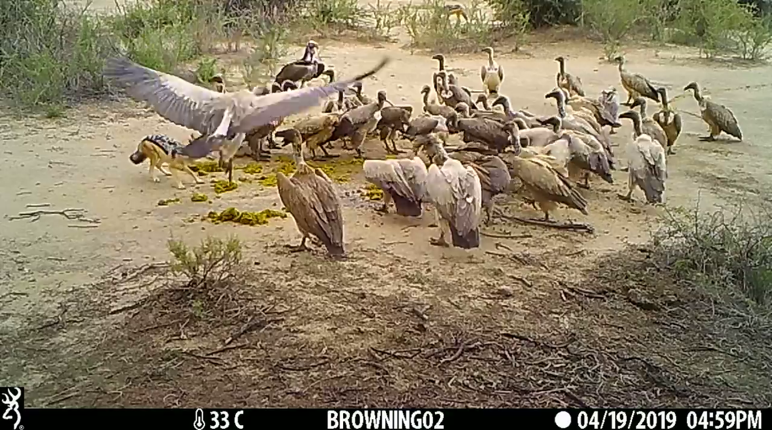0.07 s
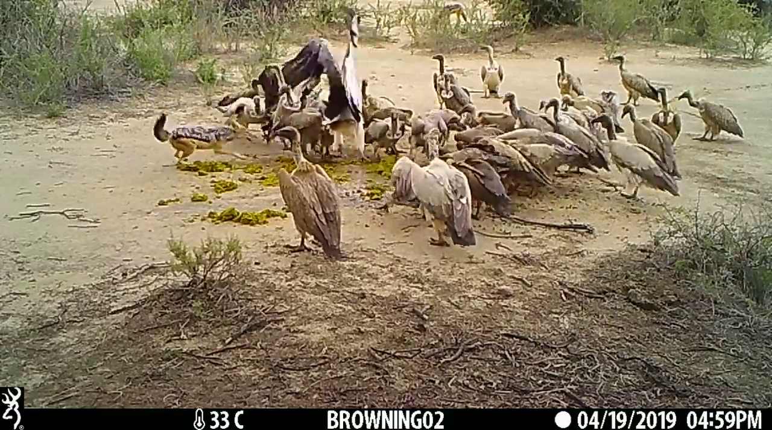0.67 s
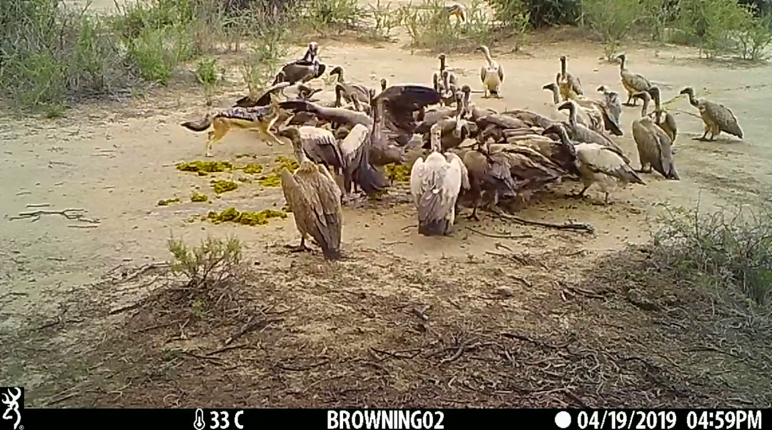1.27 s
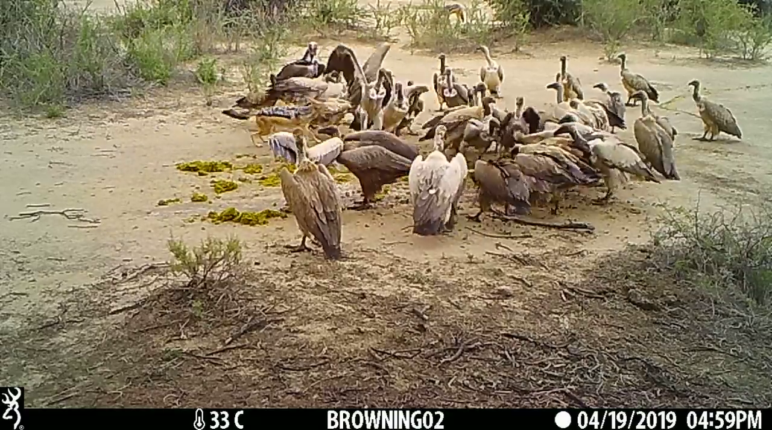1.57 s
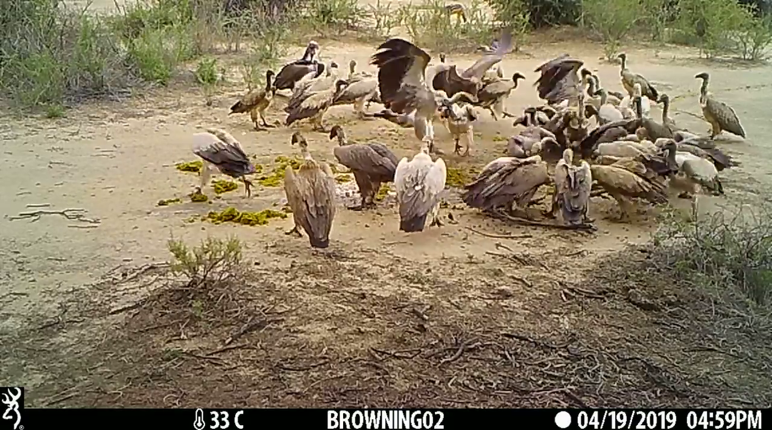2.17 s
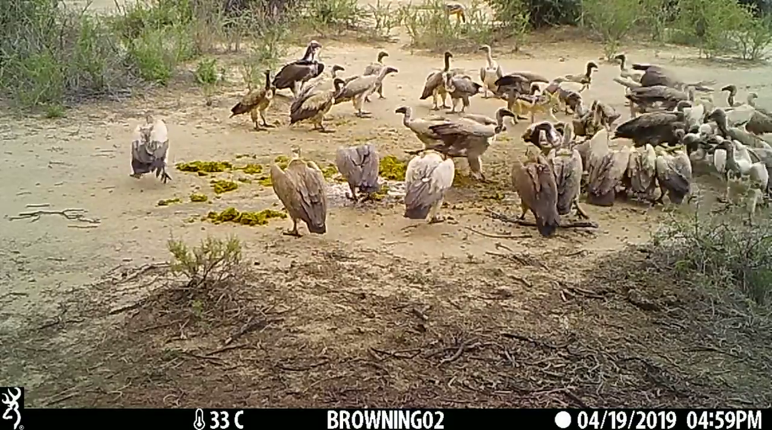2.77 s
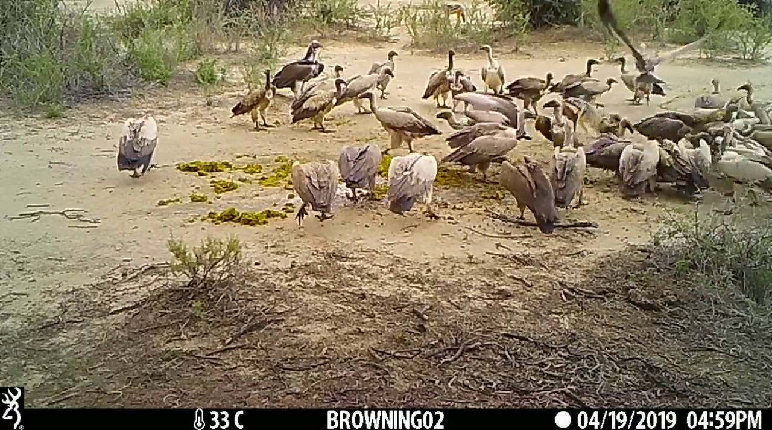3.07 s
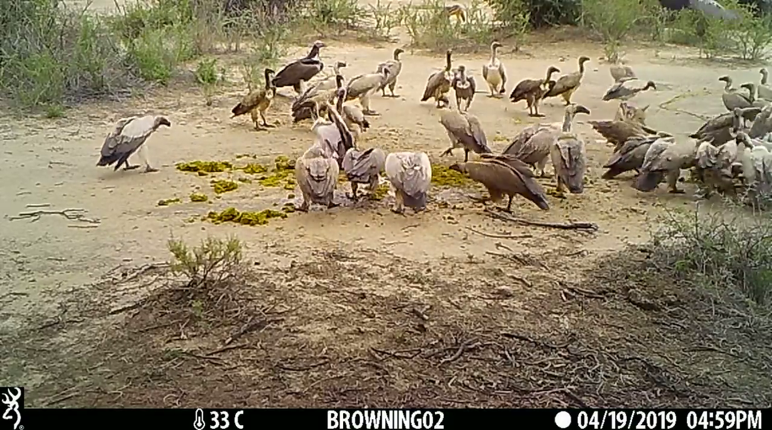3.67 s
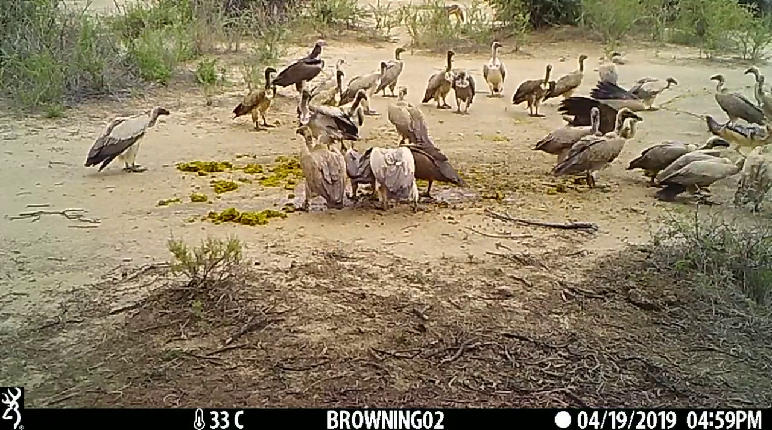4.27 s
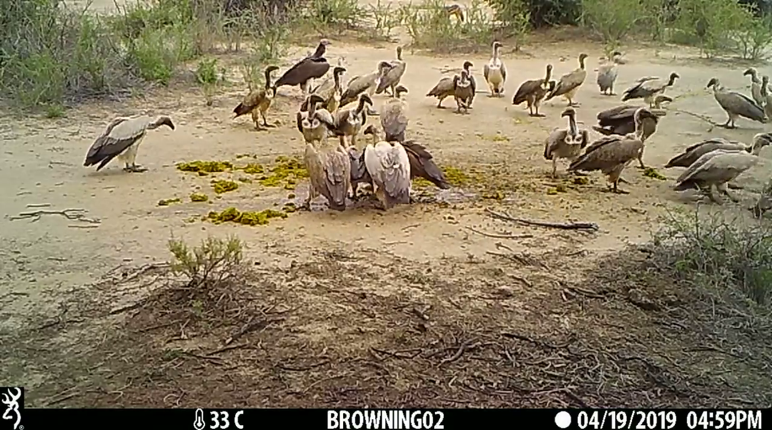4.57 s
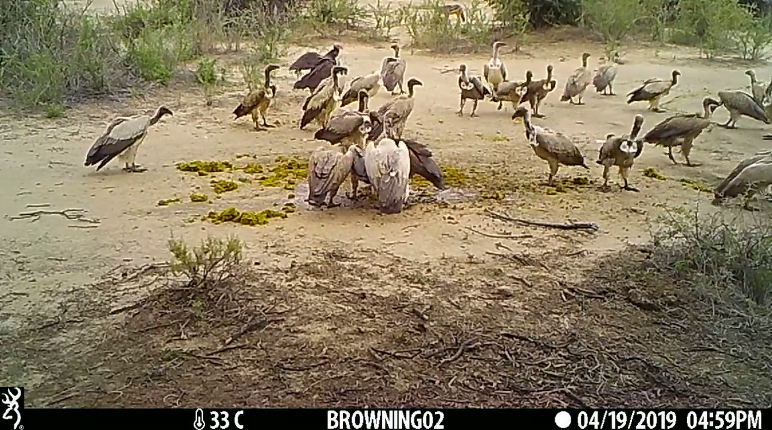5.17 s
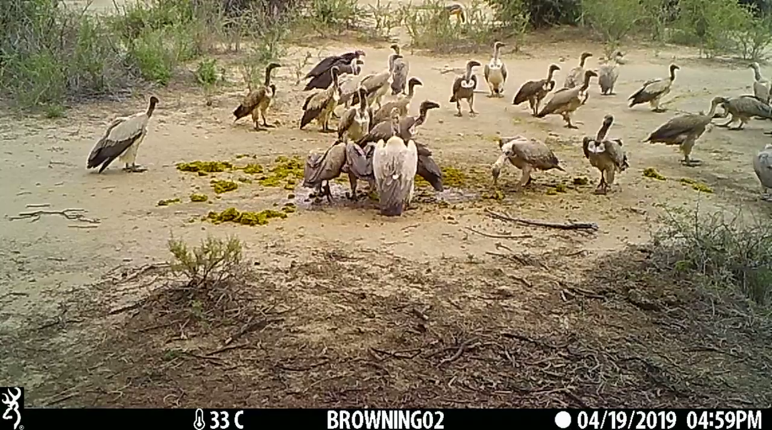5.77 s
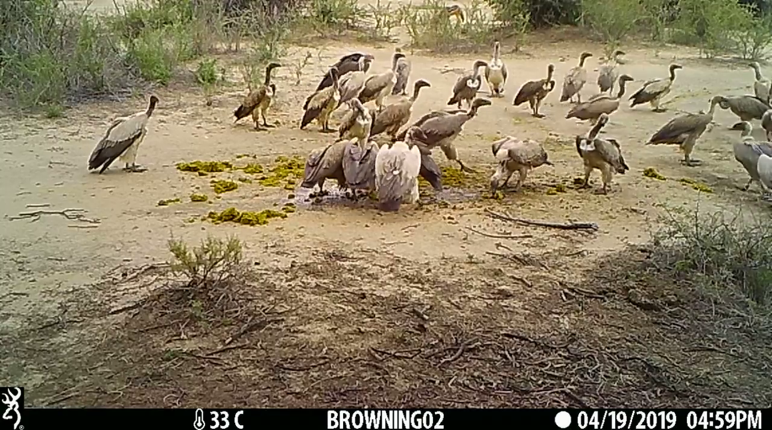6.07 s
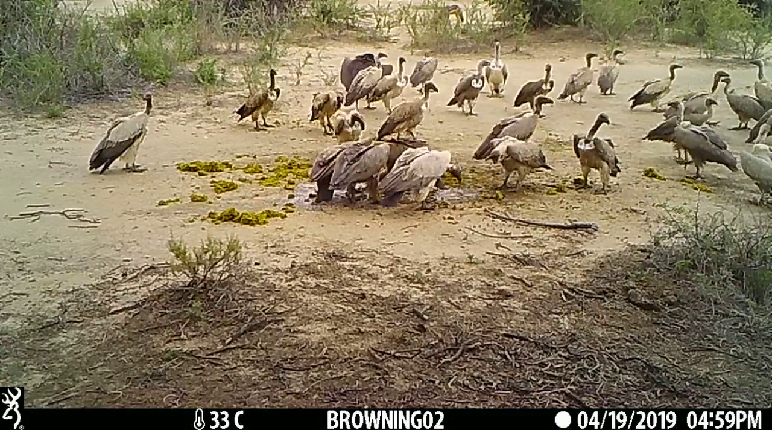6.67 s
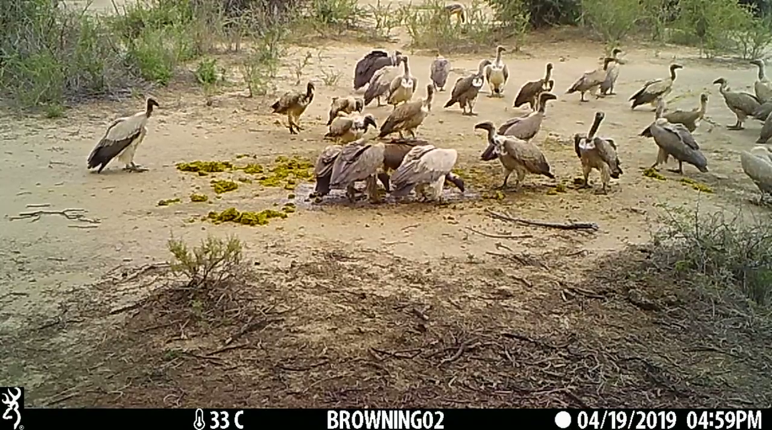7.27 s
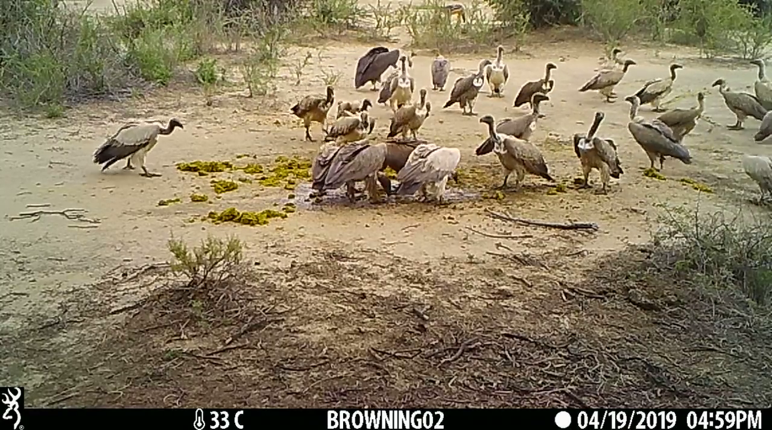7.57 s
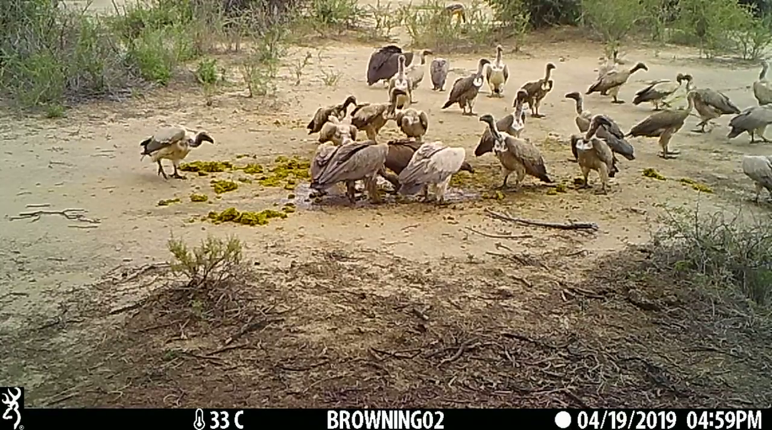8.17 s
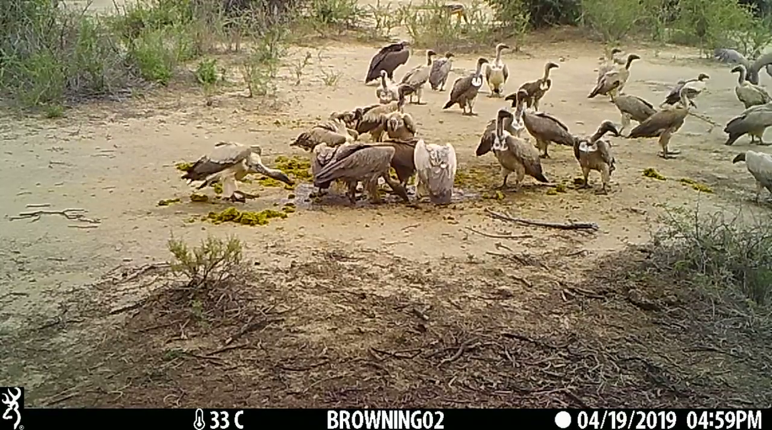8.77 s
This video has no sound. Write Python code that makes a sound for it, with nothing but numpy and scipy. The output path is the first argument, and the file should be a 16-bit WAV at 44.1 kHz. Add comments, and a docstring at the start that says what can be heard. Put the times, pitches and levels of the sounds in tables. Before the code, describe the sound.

A flock of vultures scuffles, flaps and pecks outdoors, one screeching briefly, then settles while light wind bumps the microphone.

```python
"""Vultures at a carcass

Vultures jostle on dry sand, heard through a small trail camera's microphone that resonates near 4.5 kHz.
One screeches close by, a second starts to squawk and others hiss: sources filtered by throat resonances.
Friction gives the scuffle of feet and the swish of wings; impacts give snaps, pecks and thumps.
A distant bird repeats a hoot and a purring trill, and a breeze buffets the microphone, hardest late on."""
import sys
import numpy as np
from scipy import signal
from scipy.fft import rfft, irfft, next_fast_len
from scipy.io import wavfile
from scipy.ndimage import uniform_filter1d

SR = 44100
rng = np.random.default_rng(int(sys.argv[2]) if len(sys.argv) > 2 else 0)


def wrap_up_sound(samples):
    """Save the sound to the file named by the first command line argument, as 16-bit audio."""
    columns = np.atleast_2d(samples).T
    # keep every value between -1 and 1, then stretch to whole-number steps
    tamed = np.clip(columns, -1, 1)
    steps = np.round(tamed * 32767).astype(np.int16)
    wavfile.write(sys.argv[1], SR, steps)


N = 388962
T = np.arange(N) / SR


# Two calls: t/s, level/dB, pitch f/Hz, roughness (0-1), lower and upper throat resonance f/Hz
SCREECH = [(2.208, -41.5, 448.8, 0.63, 1750, 4380), (2.25, -29, 480.8, 0.58, 2200, 4250),
           (2.283, -29.5, 472.8, 0.43, 2150, 4070), (2.308, -28.5, 521.3, 0.4, 2220, 3900),
           (2.326, -26.5, 533.7, 0.61, 2780, 3920), (2.348, -29, 525, 0.58, 2920, 3820),
           (2.372, -33, 482, 0.25, 2450, 4220), (2.388, -38, 441, 0.37, 2620, 4290),
           (2.424, -33.5, 431, 0.33, 2430, 4370), (2.443, -38, 423, 0.2, 2480, 4180)]
SQUAWK = [(8.772, -58.5, 399.5, .4, 1190, 4400), (8.8, -51.5, 436, 0.48, 1310, 4400),
          (8.83, -48, 442, .9, 1340, 4300)]
# Their throat responses: f/Hz, level/dB
SCREECH_THROAT = [(400, -38.5), (850, -42), (1150, -20), (1500, -4), (1800, -5.5), (2100, -4.5),
                  (2600, -2.5), (3300, -2.5), (4000, 1.5), (5100, -1), (5800, -10.5), (6500, -15.5),
                  (9000, -38.5), (14000, -48)]
SQUAWK_THROAT = [(400, -30), (900, -16), (1280, -6.5), (1750, -14), (2200, -10), (2600, -5), (3100, -10),
                 (3600, -9), (4300, -10), (6000, -19), (9000, -31), (14000, -41.5)]

def screech(rows, throat, low_db, top_db, width_hz, rasp_db, jitter, sharpen_db=9):
    """Source and filter: a wavering membrane and puffs of air drive two sliding throat resonances."""
    t, level_db, hz, rough, low_hz, top_hz = curves(rows)
    n, rough = len(t), np.clip(rough, .15, 1)
    cycles = np.cumsum(hz * (1 + jitter * wander(n, rate=350))) / SR
    # the long windpipe smears each pulse, and every partial flickers on its own
    partials = sum(amp(2.75 * wander(n, rate=73.2)) * np.cos(2 * np.pi * (k * cycles + rng.random()))
                   for k in range(1, 27))
    puffs = (.5 + np.exp(-(cycles % 1) / 0.98)) * rng.standard_normal(n)
    body = colour((1 - rough) * unit(partials) + rough * unit(puffs), throat)
    # when rough, the membrane slaps chaotically: some cycles are far stronger than others
    slaps = amp(rasp_db * rough * wander(n, rate=570))
    ring = amp(low_db) * resonate(body, low_hz, width_hz)
    ring += amp(top_db) * resonate(body, top_hz, width_hz) * slaps
    # the throat rings more strongly as the voice clears
    voice = body * np.sqrt(slaps) + amp(sharpen_db * (1 - rough)) * ring
    envelope = amp(level_db) * gate(t, attack_s=0.0056, release_s=0.0079)
    return t[0], envelope * steady(voice, samples=500)


# How hard the flock jostles: t/s, level/dB
COMMOTION = [(0, -65), (.4, -64), (1.15, -59), (1.85, -59), (2.2, -57), (2.85, -61.5), (3.45, -62),
             (4.15, -60), (4.95, -64.5), (5.3, -68), (5.7, -65.5), (6.15, -69.5), (6.9, -70.5),
             (7.3, -72.5), (7.75, -67.5), (8.1, -69.5), (8.5, -62.5), (8.8, -66.5)]

def commotion(follow=1, scramble_db=-60):
    """Common modulation: a gain that follows the jostling by some share; 1 in a full scramble."""
    return amp(follow * (np.interp(T, *np.transpose(COMMOTION)) - scramble_db))


# Spectrum of scraped sand: f/Hz, level/dB
SAND_SPECTRUM = [(900, -39), (2000, -24.5), (3100, -15), (3800, -10.5), (4500, 0.5), (5100, -9),
                 (6000, -16), (7500, -23), (10000, -31.5), (15000, -52)]

def scuffle(gain_db=-59):
    """Sliding friction of feet on sand: a smooth rub, clumps of grit and dry ticks of litter."""
    rub = rng.standard_normal(N) + amp(-3) * crackle(per_s=1500, spread_db=4.5)
    clumps = amp(2 * wander(N, rate=43))
    ticks = amp(-12) * unit(scatter(crackle(per_s=49, spread_db=9), spread_s=.003))
    return amp(gain_db) * commotion() * colour(rub * clumps + ticks, SAND_SPECTRUM)


# Beak and twig snaps: t/s, relative peak level/dB, knock level/dB relative to the ring
SNAPS = [(0.052, -42, -30), (0.897, -38, -30), (1.045, -40.5, -13), (1.277, -40, -30), (2.0396, -40, -27),
         (2.1752, -29.5, -35), (2.6517, -39.5, -9.5), (2.8175, -40, -30), (2.9541, -42, -15),
         (3.1862, -44, -11), (3.419, -44, -23), (3.5643, -44.5, -22), (3.604, -44, -30), (3.8113, -41, -30),
         (4.114, -38.5, -27), (4.7704, -41.5, -30), (4.8737, -43.5, -5), (6.1053, -48.5, -24),
         (6.476, -42, -35), (6.6881, -48.5, -11), (6.8273, -52, -29), (7.0704, -42, -27),
         (7.088, -45.5, -15), (7.1832, -50, -29), (7.618, -51, -22), (7.7159, -44.5, -29),
         (8.0605, -46, -27), (8.1602, -50, -9)]

def snaps(gain_db=1, knock_gain_db=1, edge_db=-22, splinter_s=0.0014):
    """Impulse excitation: a sharp break rings the microphone, with a woody knock and a bright edge."""
    out, t = np.zeros(N), np.arange(1024) / SR
    bands = [signal.butter(2, hz, "band", fs=SR) for hz in ([1100, 3000], [6000, 10000])]
    for s, db, knock_db in SNAPS:
        crack = (t == 0) + .17 * rng.standard_normal(len(t)) * np.exp(-t / splinter_s)
        ring = resonate(resonate(crack, 4500 * rng.uniform(1, 1.03), 720), 4060, 1650)
        knock, edge = [signal.lfilter(b, a, scatter(crack, spread_s=.002)) for b, a in bands]
        snap = peak(ring) + amp(knock_db + knock_gain_db) * peak(knock) + amp(edge_db) * peak(edge)
        add(out, s + 0.00082, amp(db + gain_db) * snap)
    return out


# Wing strokes, feather flicks and two hissing surges of breath in the screech (2.249 and 2.341 s):
# crest t/s, level/dB, half-length t/s, tilt/(dB per octave)
FLAPS_AND_BREATHS = [(0.112, -61.5, .026, -0.5), (.173, -58.5, .014, 3.5), (0.454, -57, .002, 9),
                     (0.49, -60, 0.025, 4), (0.74, -61, 0.0064, -5), (1.048, -57, .006, 6),
                     (1.142, -50.5, 0.016, 3.5), (1.202, -55, .003, 14), (1.279, -46.5, 0.0088, .5),
                     (1.563, -53, 0.012, -.5), (1.591, -48.5, 0.0045, 3), (1.807, -58, 0.011, -5.5),
                     (2.148, -51, 0.012, -0.5), (2.249, -44.5, 0.015, 2.5), (2.341, -45.5, 0.014, 5.5),
                     (2.65, -52, .008, 11.5), (2.721, -53, .003, 4), (3.101, -60.5, 0.02, 6),
                     (3.197, -56, 0.0059, 1), (3.441, -57, 0.02, 1.5), (3.715, -58, .032, -2),
                     (4.53, -59, 0.011, 3), (4.817, -62.5, 0.026, -5.5), (5.079, -63, 0.047, -2.5),
                     (5.944, -60, .003, 14), (7.07, -60, 0.0077, 8)]
# Spectrum of these bursts: f/Hz, level/dB
BURST_SPECTRUM = [(150, -35), (650, -19), (1300, -12.5), (3000, -5), (3900, 1.5), (4550, 7), (5300, -2),
                  (6500, -8.5), (9000, -18), (14000, -43)]

def flaps_and_breaths():
    """Amplitude-modulated noise: each rush of feathers or of breath swells and dies."""
    out, t = np.zeros(N), np.arange(-SR // 16, SR // 16) / SR
    for s, db, half_s, tilt_db in FLAPS_AND_BREATHS:
        rush = rng.standard_normal(len(t)) * amp(4.2 * wander(len(t), rate=900))
        swell = amp(db) / np.cosh(1.11 * t / half_s)
        add(out, s + t[0], swell * colour(rush, BURST_SPECTRUM, tilt_db))
    return out


# Spectrum of brushing wings: f/Hz, level/dB
WING_SPECTRUM = [(100, -27), (400, -7), (680, -13.5), (1000, -2), (1500, 1.5), (2800, 1.5), (4500, 7.5),
                 (6500, -8.5), (9000, -10.5), (14000, -24.5)]

def wings(gain_db=-65):
    """Friction noise: stiff feathers swish and flutter as they brush past each other."""
    rub = rng.standard_normal(N) + 0.46 * crackle(per_s=900, spread_db=8)
    flutter = amp(2.5 * wander(N, rate=66))
    return amp(gain_db) * commotion(follow=0.8) * colour(rub * flutter, WING_SPECTRUM)


# The loudest pecks: t/s, relative peak level/dB, resonance f/Hz
PECKS = [(1.1166, -51, 1420), (1.3958, -49, 2060), (1.6848, -51.5, 1160), (3.1862, -50, 2300),
         (3.565, -52, 2240), (3.7763, -49, 1710), (3.904, -51, 1270), (4.123, -52, 2360),
         (4.2655, -56, 1960)]

def pecks(gain_db=-1, width_hz=900, contact_s=0.0024, faint_db=-58, faint_hz=1700):
    """Heavy damping: a beak or claw strikes something soft and excites one wide, dead resonance."""
    out, t, busy = np.zeros(N), np.arange(1024) / SR, commotion(follow=0.46)
    faint = [(when * N / SR, faint_db + 20 * np.log10(busy[int(when * N)]), faint_hz * 2 ** (pitch - .5))
             for when, pitch in rng.random((16, 2))]
    for s, db, hz in PECKS + faint:
        contact = rng.standard_normal(len(t)) * np.exp(-t / contact_s)
        knock = resonate(resonate(contact, hz, width_hz), hz, 2 * width_hz)
        add(out, s, amp(db + gain_db) * peak(knock))
    return out


# Landings and hops: t/s, peak level/dB, resonance f/Hz
THUMPS = [(1.675, -69, 237), (1.804, -76, 200), (2.021, -72, 190), (2.341, -61, 326), (2.601, -60, 280),
          (2.649, -60, 258), (4.425, -66, 370), (4.502, -66.5, 350)]

def thumps(rise_s=0.007):
    """Inelastic impact: sand quickly damps the dull blow of a heavy body."""
    out, t = np.zeros(N), np.arange(4096) / SR
    for s, db, hz in THUMPS:
        earth = resonate(resonate(rng.standard_normal(len(t)), hz, 170), hz, 290)
        add(out, s, amp(db) * peak(earth * t * np.exp(-t / rise_s)))
    return out


# Spectrum of footfalls: f/Hz, level/dB
TREAD_SPECTRUM = [(50, -30), (110, -5), (180, 5.5), (260, -2.5), (380, -1.5), (520, -2), (700, -46),
                  (1500, -22)]

def tread(gain_db=-82, gather_s=0.79, near_db_per_s=.5):
    """Superposition: soft footfalls merge into a low patter that builds as the birds crowd nearer."""
    steps = rng.standard_normal(N) * amp(4 * wander(N, rate=24))
    nearing = amp(near_db_per_s * T) * np.minimum(T / gather_s, 1) ** 2
    return amp(gain_db) * commotion(follow=0.87) * nearing * colour(steps, TREAD_SPECTRUM)


# Farther hisses: start t/s, length t/s, level/dB, lower and upper resonance f/Hz,
# relative level/dB of the upper one at mid-hiss
HISSES = [(5.219, 0.2006, -62.5, 1540, 2390, 2.5), (8.178, 0.078, -68.5, 1380, 1730, -8),
          (8.25, 0.172, -72, 1350, 1634, -7.5)]

def hisses(width_hz=480, edge_db=-6, open_db_per_s=55):
    """Filtered turbulence: rasping air excites two throat resonances and an edge an octave higher."""
    out = np.zeros(N)
    for s, length, db, low_hz, top_hz, top_db in HISSES:
        t = np.arange(0, length, 1 / SR)
        air = rng.standard_normal(len(t)) * amp(1.5 * wander(len(t), rate=400))
        opening_db = open_db_per_s * (t - length / 2)  # the upper resonance grows as the beak opens
        modes = [(low_hz, 0, 1), (top_hz, top_db + opening_db, -1), (2 * top_hz, edge_db, 1)]
        voice = sum(sign * amp(mode_db) * resonate(resonate(air, hz, width_hz), hz, 2 * width_hz)
                    for hz, mode_db, sign in modes)
        add(out, s, amp(db) * gate(t, attack_s=0.025, release_s=0.036) * steady(voice, samples=2000))
    return out


# Phrases of the distant bird: hoot t/s, trill t/s, relative level/dB
COOS = [(0.486, .724, -68.5), (4.507, 4.751, -68.5), (6.941, 7.204, -68)]

def far_bird(note_hz=862, waver_hz=15):
    """Modulation of one tone: each phrase is a hoot, then a trill on the same note."""
    out = np.zeros(N)
    for hoot_s, trill_s, db in COOS:
        add(out, hoot_s, amp(db - 2) * hoot(note_hz, waver_hz))
        add(out, trill_s, amp(db - 1) * trill(note_hz, waver_hz))
    return out


def hoot(note_hz, waver_hz, length_s=.088, break_s=0.0476, slide_s=.006, sag_hz=110, fade_db=-9):
    """Frequency modulation: a tone holds, then breaks to a lower, softer note."""
    t = np.arange(0, length_s, 1 / SR)
    broken = .5 + .5 * np.tanh((t - break_s) / slide_s)
    hz = note_hz - sag_hz * broken + waver_hz * wander(len(t), rate=206)
    db = broken * (fade_db + 3 * wander(len(t), rate=120))
    return amp(db) * gate(t, attack_s=0.013, release_s=0.0124) * tone(hz)


def trill(note_hz, waver_hz, length_s=.68, pips_per_s=36.6, sag_hz=105.6, chirp_hz=30, fade_db=-3.5):
    """Amplitude modulation: a tone is chopped into falling pips and sags as the phrase runs out."""
    t = np.arange(0, length_s, 1 / SR)
    spent = (t / length_s) ** 3
    hurry = 1.2 * np.exp(-t / .045)  # the first pips come faster
    beat = (t * pips_per_s - hurry + .04 * wander(len(t), rate=20)) % 1
    pips = np.sin(np.pi * beat) ** 6
    hz = note_hz - sag_hz * spent + chirp_hz * (1 - 2 * beat) + waver_hz * wander(len(t), pips_per_s)
    db = fade_db * spent + 2 * wander(len(t), pips_per_s)
    return amp(db) * gate(t, attack_s=.035, release_s=.07) * pips * tone(hz)


# Spectrum of wind on the microphone: f/Hz, level/dB
WIND_SPECTRUM = [(15, 0), (30, 1.5), (65, -3.5), (130, -15), (250, -29.5), (600, -59), (2000, -98.5)]
# Gusts: crest t/s, relative level/dB, rise t/s, fall t/s, eddy speed (a ratio that scales the spectrum)
GUSTS = [(.98, -77.5, 0.056, .05, .9), (1.44, -81, .03, .06, 0.83), (4.74, -72, .08, .08, 0.56),
         (5.4, -77, .3, .3, .6), (6.399, -60.5, .018, 0.02, 1.6), (6.76, -62, .03, .07, 1.3),
         (6.949, -67, 0.065, .07, .8), (7.41, -57, .025, .06, 1.23), (7.468, -64, .015, .04, 1.4),
         (7.65, -64.5, 0.061, .08, 0.96), (7.968, -64, 0.046, .1, .9), (8.13, -48.5, 0.024, 0.0099, 1.3),
         (8.24, -63, 0.033, 0.11, 0.61), (8.435, -62, 0.13, .03, 1.75), (8.649, -60, 0.095, 0.093, 1.17),
         (8.8, -56, .03, .06, 1.4)]

def wind(breeze_db=-96, freshen_db_per_s=1.7, rumble_db=-3, buffet_db=3, buffet_s=0.0031):
    """Turbulent pressure: a breeze freshens; at each gust's crest an eddy rocks the diaphragm."""
    breeze = amp(breeze_db + freshen_db_per_s * T + 4 * wander(N, rate=6.3))
    out = breeze * colour(rng.standard_normal(N), WIND_SPECTRUM)
    t = np.arange(-SR, SR) / SR
    for s, db, rise_s, fall_s, speed in GUSTS:
        rumble = colour(rng.standard_normal(len(t)), np.multiply(WIND_SPECTRUM, [speed, 1]))
        rumble *= amp(rumble_db + 3 * wander(len(t), rate=30))
        swell = np.exp(-np.maximum(-t / rise_s, t / fall_s))
        passage = (t * speed / buffet_s) ** 2
        eddy = amp(buffet_db) * (1 - passage) * np.exp(-passage / 2)
        gust = rumble * swell + eddy
        add(out, s + t[0], amp(db) * gust[s + t >= 0])
    return out


# Spectrum of still air and microphone hiss: f/Hz, level/dB
AIR_SPECTRUM = [(25, -7.5), (60, -10), (150, -8), (500, -6), (1200, -7), (2500, -26), (3700, -18),
                (4450, -4.5), (6300, -17), (10000, -12.5), (15500, -13)]

def still_air(level_db=-77):
    """Stationary noise: still air and the microphone's own hiss set the floor."""
    return amp(level_db) * colour(rng.standard_normal(N), AIR_SPECTRUM)


def scatter(x, spread_s, count=24):
    """Scattering: sand and packed birds add weak echoes just behind the direct sound."""
    delay = np.linspace(.05, 1, count) ** 2 * spread_s * rng.uniform(.8, 1, count)
    taps = np.zeros(int(spread_s * SR) + 2)
    taps[(delay * SR).astype(int)] = 0.55 * rng.choice([-1, 1], count) * np.exp(-delay / spread_s)
    taps[0] = 1
    return signal.fftconvolve(x, taps)[:len(x)]


def crackle(per_s, spread_db):
    """Shot noise: sparse impacts of very uneven size; rms 1."""
    size = amp(spread_db * np.minimum(rng.exponential(1, N), 4))
    return unit(size * rng.choice([-1, 1], N) * (rng.random(N) < per_s / SR))


def resonate(x, hz, width_hz):
    """Damped resonance of gain 1 whose frequency can follow a curve."""
    turn = np.exp(2j * np.pi * np.cumsum(hz * np.ones(len(x))) / SR)
    pole = np.exp(-np.pi * width_hz / SR)
    return 2 * (turn * signal.lfilter([1 - pole], [1, -pole], x / turn)).real


def colour(x, spectrum, tilt_db=0):
    """Linear filtering by a spectrum tilted tilt_db an octave; rms 1."""
    size = next_fast_len(len(x) + 2048)
    octave = np.log2(np.fft.rfftfreq(size, 1 / SR) + 1)
    hz, db = np.transpose(spectrum)
    gain = amp(np.interp(octave, np.log2(hz), db + tilt_db * np.log2(hz)))
    return unit(irfft(rfft(x, size) * gain, size)[:len(x)])


def wander(n, rate):
    """Random modulation of rms 1 that changes about rate times a second."""
    knots = rng.standard_normal(n // 8 + 4)
    return unit(np.interp(np.arange(n) * rate / SR, np.arange(len(knots)), knots))


def curves(rows):
    """Linear interpolation: a time axis, then every other column along it."""
    s, *columns = np.transpose(rows)
    t = np.arange(s[0], s[-1], 1 / SR)
    return [t] + [np.interp(t, s, c) for c in columns]


def tone(hz):
    """A sine whose phase is the integral of frequency."""
    return np.sin(2 * np.pi * np.cumsum(hz) / SR)


def gate(t, attack_s, release_s):
    """Trapezoidal envelope: attack, hold, release."""
    return np.clip(np.minimum((t - t[0]) / attack_s, (t[-1] - t) / release_s), 0, 1)


def steady(x, samples):
    """Normalisation by the running rms."""
    return x / np.sqrt(uniform_filter1d(x ** 2, size=samples) + 1e-12)


def unit(x):
    """Normalisation to rms 1."""
    return x / np.sqrt(np.mean(x ** 2) + 1e-20)


def peak(x):
    """Normalisation to peak 1."""
    return x / abs(x).max()


def amp(db):
    """Decibels to amplitude ratio."""
    return 10 ** (np.asarray(db) / 20)


def add(mix, s, sound):
    """Superposes a sound at time s."""
    part = mix[max(round(s * SR), 0):][:len(sound)]
    part += sound[:len(part)]


def scene():
    """Superposition of the squabbling flock and the quiet of open bush."""
    out = still_air()
    out += scuffle() + wings() + tread() + flaps_and_breaths() + snaps() + pecks() + thumps()
    out += hisses() + far_bird() + wind()
    add(out, *screech(SCREECH, SCREECH_THROAT, low_db=1.5, top_db=6.5, width_hz=230,
                      rasp_db=6.5, jitter=0.02))
    add(out, *screech(SQUAWK, SQUAWK_THROAT, low_db=2, top_db=-3, width_hz=130,
                      rasp_db=13, jitter=0.021))
    return out[None]


def record(dry):
    """Band limiting: the camera passes sound below 15.7 kHz."""
    lowpass = signal.firwin(511, 15700, window=("kaiser", 9), fs=SR)
    return signal.oaconvolve(dry, lowpass[None], "same")


dry = scene()
out = record(dry)
wrap_up_sound(out)
```